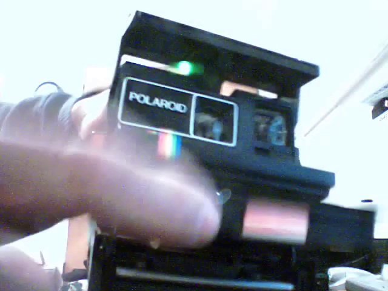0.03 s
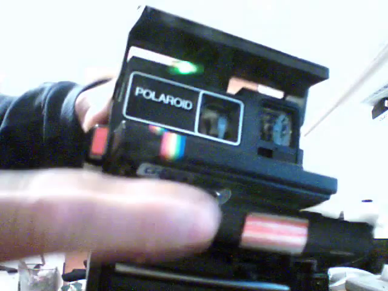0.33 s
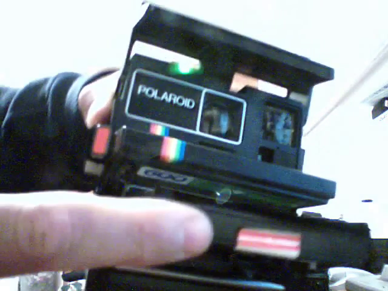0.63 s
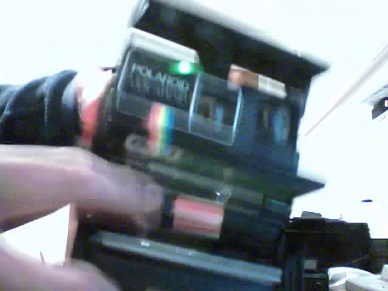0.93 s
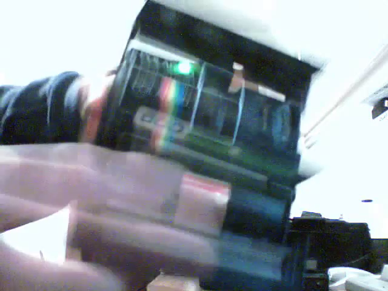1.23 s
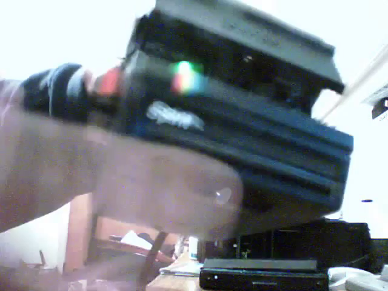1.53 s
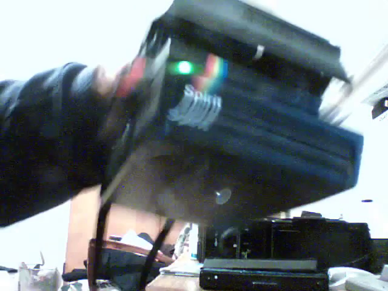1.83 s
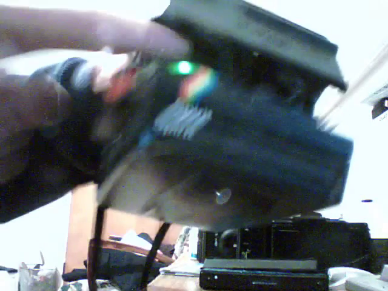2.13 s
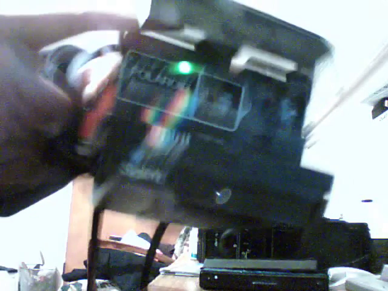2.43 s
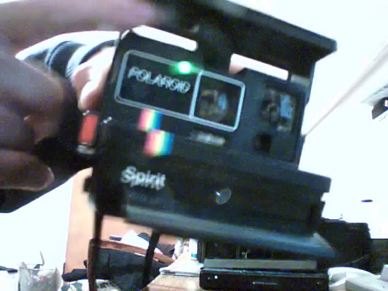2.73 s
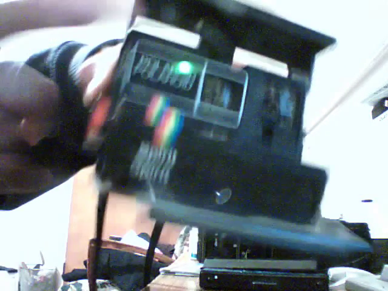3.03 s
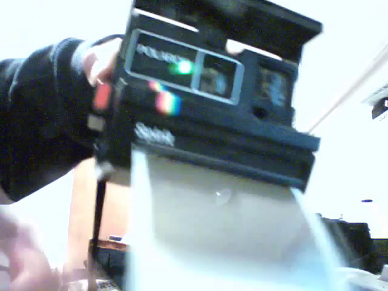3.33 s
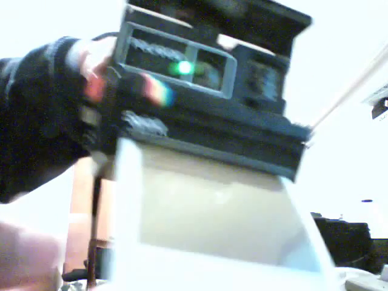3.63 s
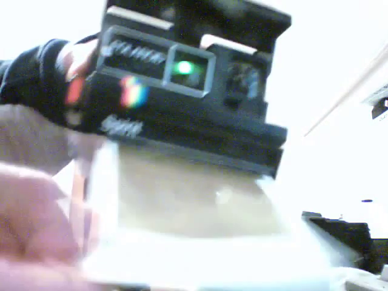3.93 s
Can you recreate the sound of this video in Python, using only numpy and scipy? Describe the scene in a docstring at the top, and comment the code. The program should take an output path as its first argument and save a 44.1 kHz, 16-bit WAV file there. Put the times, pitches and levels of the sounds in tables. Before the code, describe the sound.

Instant camera's shutter button snaps, then its motor whines and rattles, ejecting a film sheet.

```python
"""A quiet room, an instant camera in the hand, close to a small microphone. Fingers rub on the plastic,
then the shutter button slides and snaps (0.7 s). A latch clunks (1.2 s) and the motor spins up a plastic
gear train, whining and rattling. A pick catches the film (2.2 s) and the gears slow as the rollers
squeeze the sheet out. The mechanism clacks home (3.2 s), the motor coasts to rest and a small spring
rings on faintly."""
import sys
import numpy as np
from scipy import signal
from scipy.fft import rfft, irfft
from scipy.io import wavfile
from scipy.ndimage import uniform_filter1d

SR = 44100
rng = np.random.default_rng(int(sys.argv[2]) if len(sys.argv) > 2 else 0)


def wav_record(signal):
    """Record a signal, one row per channel, as 16-bit PCM in the file named by sys.argv[1]."""
    frames = np.transpose(np.atleast_2d(signal))
    bounded = np.clip(frames, -1, 1)
    # unit amplitude maps onto the largest positive 16-bit level
    quanta = np.round(bounded * 32767).astype(np.int16)
    wavfile.write(sys.argv[1], SR, quanta)


N = 176400
T = np.arange(N) / SR

# tooth rattle while the gears run light (t/s, level/dB)
FREE_RATTLE = [(1.19, -55), (1.24, -42), (1.38, -32), (1.8, -30), (2.2, -29), (2.26, -53)]
# gear whine while driving the rollers (t/s, level/dB)
ROLLER_WHINE = [(2.38, -33.5), (2.44, -30.5), (2.6, -31), (2.72, -26.5), (3.08, -29), (3.16, -38),
                (3.38, -34.5), (3.5, -41.5)]


def motor(max_backlash=.55, full_backlash_hz_per_s=2600):
    """Tooth rate, teeth passed and backlash: quick changes of speed make the gears run unevenly."""
    tooth_rate = [(1.22, 199.8), (1.3, 375.6), (1.35, 489), (1.41, 565.5), (2.19, 562.2), (2.26, 331.6),
                  (2.39, 306.2), (2.445, 387.4), (2.56, 418), (2.68, 410), (2.77, 430.2), (2.9, 441.7),
                  (3.15, 433.7), (3.205, 362.2), (3.28, 489.1), (3.32, 494.8), (3.4, 364.9), (3.6, 203.5)]  # teeth meshing per second (t/s, f/Hz)
    tooth_hz = follow(tooth_rate)
    acceleration = uniform_filter1d(np.abs(np.gradient(tooth_hz)), size=2600) * SR
    backlash = max_backlash * np.clip(acceleration / full_backlash_hz_per_s, 0, 1) ** 2
    teeth = np.cumsum(tooth_hz * (1 + (.0015 + .03 * backlash) * walk(90))) / SR
    return tooth_hz, teeth, backlash


def gear_whine(tooth_hz, teeth, backlash):
    """Meshing teeth whine, and hum under load; a loose idler wanders in pitch beside them."""
    # gears running light, hum under load, idler (t/s, level/dB)
    free_level = [(1.25, -48), (1.34, -27.5), (1.43, -39), (1.72, -35), (1.8, -26.5), (2.17, -27),
                  (2.22, -42)]
    hum_level = [(2.42, -45), (2.53, -30), (2.71, -30.5), (2.83, -38), (3.14, -33.5), (3.43, -44)]
    idler_level = [(1.28, -46), (1.36, -35), (1.66, -35.5), (2.2, -40)]
    # partials (multiple of tooth rate, level/dB, flutter 0-1)
    free_partials = [(1, -1, 0.12), (2, 6.5, 0)]
    loaded_partials = [(2, 2.5, 0.075), (2.91, -2, 0.41), (3, 0.5, 1), (4, -8.5, 0.93), (5.83, -6.5, 0.42)]
    idler_partials = [(1.311, -11, 0.5), (1.455, -2.5, 0.2), (2.322, -4.5, 0.8), (2.47, -6, .5)]
    free = fader(free_level) * whine(teeth, free_partials, backlash=backlash)
    loaded = fader(ROLLER_WHINE) * whine(teeth, loaded_partials, backlash=backlash)
    hum = fader(hum_level) * unit(np.sin(2 * np.pi * teeth))
    idler_teeth = np.cumsum(tooth_hz * (1 + .012 * walk(25))) / SR
    idler = fader(idler_level) * whine(idler_teeth, idler_partials)
    return housing(free + loaded + hum + idler)


def gear_rattle(teeth, pinion_teeth=12, grind_share=.72):
    """Worn teeth rasp in a pattern that returns with each turn of the pinion, amid random grinding."""
    # rattle spectra, running light and under load (f/Hz, level/dB)
    free_colour = [(150, -82.5), (270, -29.5), (370, -9), (520, -5.5), (800, 0.5), (1010, -5.5), (1330, 4),
                   (1550, -3), (1950, -3.5), (2850, -13), (3200, -20.5), (3850, -15.5), (4400, -30.5),
                   (6800, -30.5), (7700, -34), (10800, -27), (12200, -34.5), (13500, -24.5), (16000, -33.5)]
    loaded_colour = [(150, -74), (270, -31.5), (370, -2), (520, -8), (740, 6.5), (1020, -4), (1230, 5.5),
                     (1500, -1.5), (2800, -3.5), (3100, -13), (3850, -13.5), (6300, -31), (7700, -26.5),
                     (11000, -23), (12200, -32), (13500, -22), (16000, -28)]
    loaded_level = [(2.2, -40), (2.25, -33.5), (2.37, -36.5), (2.45, -32.5), (3.08, -30.5), (3.2, -24.5),
                    (3.3, -31.5), (3.41, -31), (3.47, -40), (3.55, -46), (3.63, -62)]  # rattle under load (t/s, level/dB)
    samples_per_tooth = 1 / np.diff(teeth).max()  # at top speed
    wear = np.interp(teeth % pinion_teeth * samples_per_tooth, np.arange(N), noise())
    grind = noise() * undb(walk(250))
    rasp = np.sqrt(1 - grind_share) * unit(wear) + np.sqrt(grind_share) * unit(grind)
    free = colour(rasp * fader(FREE_RATTLE), free_colour)
    return free + colour(rasp * fader(loaded_level), loaded_colour)


def housing(x, boom_hz=740, notch_hz=1000, low_cut_hz=330):
    """The gear housing booms at one pitch, swallows another and radiates no bass."""
    boom = signal.lfilter(*signal.iirpeak(boom_hz, Q=10, fs=SR), x)
    hollow = signal.lfilter(*signal.iirnotch(notch_hz, Q=6, fs=SR), x + boom)
    return signal.sosfilt(signal.butter(4, low_cut_hz, "highpass", fs=SR, output="sos"), hollow)


def mechanism():
    """Latch, pick and other moving parts clack against the plastic casing."""
    clacks = [(.185, -50.5, .004, -5.5), (0.943, -43, 0.0025, -4), (.985, -34.5, 0.0028, -5),
              (1.127, -31.5, 0.002, -7), (1.171, -8.5, 0.0096, 2), (1.1793, 1, 0.0064, -0.5),
              (1.197, -22, 0.054, 1), (2.2268, -7.5, 0.0025, 0), (3.138, -18.5, 0.012, -0.5),
              (3.195, -13.5, 0.0078, 1), (3.2358, -10, 0.0044, -2.5), (3.404, -22, 0.014, -1),
              (3.643, -42, 0.0025, -4), (3.801, -32, 0.0026, -5.5), (3.964, -38.5, 0.0073, -0.5)]  # contacts (t/s, level/dB, decay/s, tilt/dB per octave)
    casing_modes = [(716, 6.5), (1400, 1.5), (1920, 6), (2200, 5), (2950, -7.5), (4050, 0), (5259, -15),
                    (6550, -13)]  # casing resonances (f/Hz, level/dB)
    return plastic(contacts(clacks), casing_modes, ring_db=-4.5)


def booms_and_spring():
    """Low, hollow booms ring after the hits; a small spring rings on after the last hard clack."""
    booms = [(0.721, 232, -38.5, 0.35), (1.182, 332, -15, 0.13), (3.146, 227.8, -37, 0.27),
             (3.184, 226, -22, 0.097)]  # low booms (t/s, f/Hz, level/dB, T60/s)
    return sum(struck(*boom) for boom in booms) + struck(start=3.5, hz=878, db=-54, t60=2.7)


def hands(hold_db=-57.5):
    """The button slides grittily and snaps, fingers rub, and a dull rumble swells with each jolt."""
    rub = [(0, -66.5), (.5, -66), (.59, -52), (.62, -45.5), (.652, -27), (.7, -25.5), (.75, -38.5),
           (.9, -56.5), (1.07, -62.5), (1.16, -43.5), (1.3, -53), (3.77, -63), (3.85, -51.5), (3.91, -60.5),
           (4, -46)]  # button and fingers sliding on plastic (t/s, level/dB)
    snaps = [(0.6625, -16, 0.0045, -1), (0.68, -13.5, 0.0038, 0), (0.7045, -12.5, 0.0085, -4),
             (.7135, -2.5, 0.0075, -2.4), (.718, -5, 0.0039, -1)]  # button catches and snap (t/s, level/dB, decay/s, tilt/dB per octave)
    button_modes = [(730, 1), (1230, 1), (1520, 4.5), (1900, 6.5), (2260, 10), (2660, -4.5), (2950, -9),
                    (6600, -11.5)]  # button and shutter resonances (f/Hz, level/dB)
    jolts = [(.71, -40.5, 0.21), (1.185, -24, 0.028), (2.26, -33, 0.04), (3.21, -34.5, 0.029),
             (3.82, -36.5, 0.1)]  # jolts of the hand (t/s, level/dB, spread/s)
    rumble_colour = [(33, -1.5), (60, -13.5), (100, -18.5), (170, -26.5), (1000, -71.5)]  # handling noise spectrum (f/Hz, level/dB)
    grit = unit(noise() * undb(1.9 * walk(430)))
    button = plastic(grit * fader(rub) + contacts(snaps), button_modes, ring_db=-8)
    shake = undb(hold_db) + sum(undb(db) * np.exp(-np.abs(T - at) / spread) for at, db, spread in jolts)
    return button + shake * unit(colour(noise(), rumble_colour))


def film():
    """The stiff sheet scrapes out through the slot in uneven grains."""
    scrape_level = [(2.22, -49), (2.5, -52.5), (2.7, -46.5), (2.98, -51.5), (3.1, -42), (3.2, -29.5),
                    (3.27, -75)]  # sheet against the slot (t/s, level/dB)
    scrape_colour = [(1500, -47.5), (3700, 8.5), (4700, -6.5), (5700, 5.5), (7300, 0), (9000, -4),
                     (16000, -19)]  # scrape spectrum (f/Hz, level/dB)
    grains = unit(noise() * undb(2 * walk(25) + 2 * walk(500)))
    return colour(grains * fader(scrape_level), scrape_colour)


def brushes(hiss_db=-26, detune=.96):
    """The motor brushes give a narrow hiss and thin whistles that rise and fall with the gear noise."""
    hiss_centre = [(1.3, 8620), (1.7, 8330), (2.2, 8420), (2.47, 8240), (2.72, 8300), (2.92, 8900),
                   (3.2, 8280)]  # centre of the hiss band (t/s, f/Hz)
    whistle_tones = [(10971, -32), (13227, -31)]  # brush whistles (f/Hz before detuning, relative level/dB)
    running = fader(FREE_RATTLE) + fader(ROLLER_WHINE)
    hiss = undb(hiss_db) * whine(np.cumsum(follow(hiss_centre)) / SR, [(1, 0, .97)], flutter_hz=550)
    whistles = sum(undb(db) * whine(hz * T, [(detune, 0, 1)], flutter_hz=140) for hz, db in whistle_tones)
    return running * hiss, running * whistles


def shaft(squeal_hz=3995):
    """A dry shaft squeals on one fluttering note."""
    squeal_level = [(1.4, -68), (1.47, -47), (1.68, -50), (1.77, -57), (2.15, -51.5)]  # shaft friction (t/s, level/dB)
    return fader(squeal_level) * whine(squeal_hz * T, [(1, 0, .54)], flutter_hz=38)


def contacts(events, rise_s=.00063):
    """Each contact chatters briefly: a decaying burst of force with its own treble tilt."""
    force = np.zeros(N + SR)
    t = T[:SR]
    octaves = np.log2(np.maximum(np.fft.rfftfreq(SR, 1 / SR), 400) / 1600)
    for start, db, decay, tilt_db in events:
        envelope = np.exp(-t / decay)
        chatter = unit_energy(rng.standard_normal(SR) * envelope * np.minimum(t / rise_s, 1))
        tilted = irfft(rfft(chatter) * undb(tilt_db * octaves)) * (t < .5)
        i = int(start * SR)
        force[i:i + SR] += undb(db) * np.linalg.norm(envelope) * tilted
    return force[:N]


def plastic(force, modes, ring_db):
    """A plastic part answers a force with a dry crack and briefly ringing modes."""
    crack_colour = [(100, -18.5), (230, -35), (350, -4), (520, -1.5), (950, 0), (1350, 4.5), (2200, 0.5),
                    (3000, -3.5), (4500, -20), (6300, -18.5), (8500, -23), (10500, -20), (12300, -34.5),
                    (14300, -15.5), (16000, -29.5)]  # crack spectrum (f/Hz, level/dB)
    ring = fade(t60=.05) * sum(undb(db) * sine(hz) for hz, db in modes)
    return colour(force, crack_colour) + undb(ring_db) * through(force, unit_energy(ring))


def panels(x, low_hz=4400, high_hz=8200, ring_db=-7.5):
    """Thin plastic panels ring on in many close treble modes."""
    ring = fade(t60=.14) * sum(sine(hz) for hz in rng.uniform(low_hz, high_hz, size=40))
    return x + undb(ring_db) * through(x, unit_energy(ring))


def room(x, early_db=-8.5, early_from_hz=2000, tail_db=-22):
    """Small surfaces near the microphone reflect the treble, hollowing it; a short, dull tail follows."""
    early, tail = (rng.standard_normal(SR) * fade(t60) * (T[:SR] > .002) for t60 in (.024, .31))
    early = signal.sosfilt(signal.butter(2, early_from_hz, "highpass", fs=SR, output="sos"), early)
    tail = signal.lfilter([1], [1, -.4], tail)  # gentle low-pass
    return x + through(x, undb(early_db) * unit_energy(early) + undb(tail_db) * unit_energy(tail))


def room_tone(level_db=-63):
    """A faint, steady hiss lies under everything."""
    floor_colour = [(100, 12.5), (170, -19.5), (400, 6.5), (1000, -4.5), (3000, -14), (16000, -26)]  # noise floor spectrum (f/Hz, level/dB)
    return undb(level_db) * colour(noise(), floor_colour)


def whine(cycles, partials, flutter_hz=45, backlash=0):
    """Partials that follow a cycle count, fluttering in strength and phase; backlash adds flutter."""
    tone = 0
    for multiple, db, flutter in partials:
        share = np.clip(flutter + backlash, 0, 1)
        wobble = (walk(flutter_hz) + 1j * walk(flutter_hz)) / np.sqrt(2)
        amplitude = np.sqrt(1 - share ** 2) + share * wobble
        tone += undb(db) * np.real(amplitude * np.exp(2j * np.pi * (multiple * cycles + rng.random())))
    return unit(tone)


def struck(start, hz, db, t60):
    """One mode that builds over two cycles and dies away."""
    age = np.maximum(T - start, 0)
    attack = 1 - np.exp(-(age * hz / 2) ** 2)
    return undb(db) * attack * np.sin(2 * np.pi * hz * age) * np.exp(-np.log(1000) * age / t60)


def colour(x, points, size=4096):
    """Causal filter of unit energy, shaped by (f/Hz, level/dB) points."""
    hz, db = np.array(points).T
    f = np.maximum(np.fft.rfftfreq(size, 1 / SR), 1)
    gain = undb(np.interp(np.log(f), np.log(hz), db))
    cepstrum = irfft(np.log(gain))
    cepstrum[size // 2:] = 0  # minimum phase
    response = irfft(np.exp(2 * rfft(cepstrum)))
    return through(x, unit_energy(response))


def through(x, response):
    """Pass a sound through an impulse response."""
    return signal.fftconvolve(x, response)[:N]


def follow(curve):
    """Frequency along a (t/s, f/Hz) curve."""
    return np.interp(T, *np.array(curve).T)


def fader(curve):
    """Gain along a (t/s, level/dB) curve, silent outside it."""
    return undb(np.interp(T, *np.array(curve).T, left=-140, right=-140))


def fade(t60):
    """One second of exponential decay."""
    return np.exp(-np.log(1000) * T[:SR] / t60)


def sine(hz):
    """One second of sine at a random phase."""
    return np.sin(2 * np.pi * (hz * T[:SR] + rng.random()))


def walk(rate_hz):
    """Smooth random drift of rms 1."""
    step = max(int(SR / rate_hz), 2)
    stairs = np.repeat(noise()[:N // step + 1], step)
    return unit(uniform_filter1d(stairs, step)[:N])


def noise():
    """White noise."""
    return rng.standard_normal(N)


def undb(db):
    """Decibels to gain."""
    return 10 ** (np.asarray(db) / 20)


def unit(x):
    """Scale to rms 1."""
    return x / np.sqrt(np.mean(x ** 2))


def unit_energy(x):
    """Scale to energy 1."""
    return x / np.linalg.norm(x)


def scene():
    """Camera and hands close up, in mono, over the room tone."""
    tooth_hz, teeth, backlash = motor()
    rattle = gear_rattle(teeth)
    hiss, whistles = brushes()
    tones = gear_whine(tooth_hz, teeth, backlash) + shaft() + whistles
    noises = rattle + hiss + mechanism() + film() + hands()
    return (room(panels(noises)) + tones + booms_and_spring() + room_tone())[None]


def record(dry, dc_offset=-.104, top_hz=15900):
    """The microphone input sits off centre, clips the hardest clacks and cuts the top."""
    clipped = np.clip(dry + dc_offset, -1, 1) - dc_offset
    return signal.sosfilt(signal.ellip(8, .2, 70, top_hz, fs=SR, output="sos"), clipped) + dc_offset


dry = scene()
out = record(dry)
wav_record(out)
```